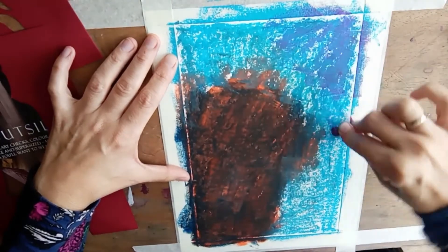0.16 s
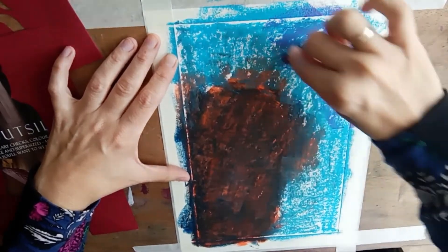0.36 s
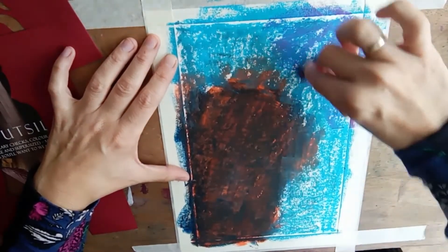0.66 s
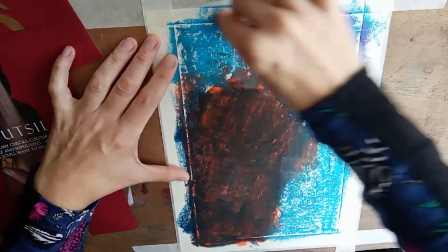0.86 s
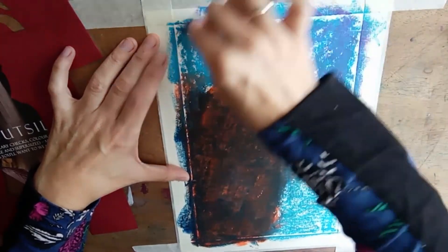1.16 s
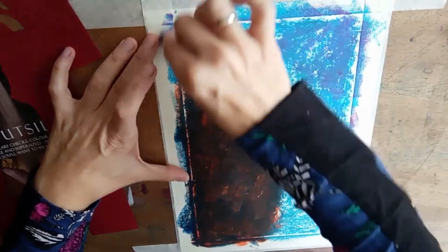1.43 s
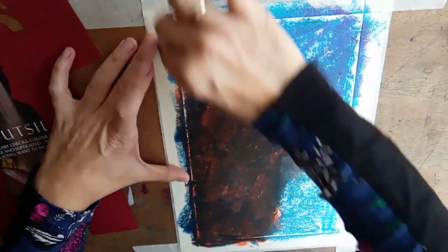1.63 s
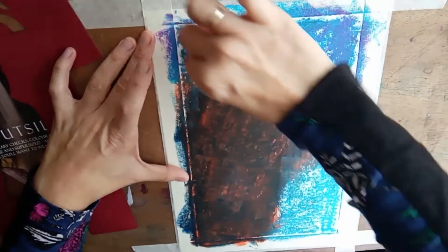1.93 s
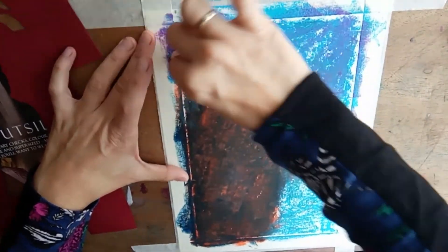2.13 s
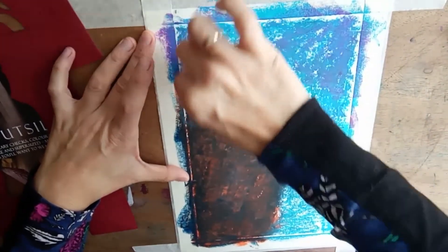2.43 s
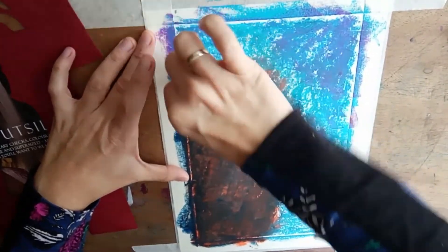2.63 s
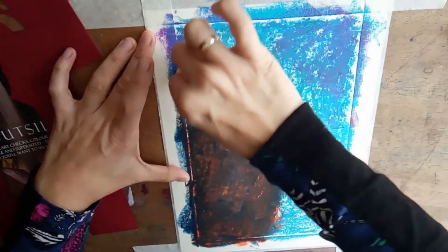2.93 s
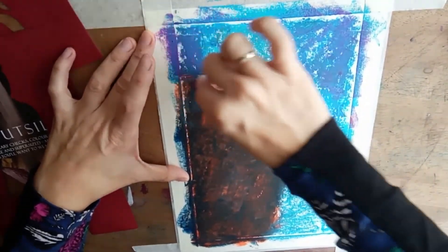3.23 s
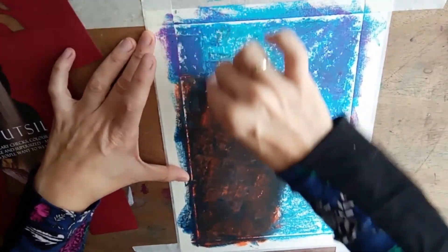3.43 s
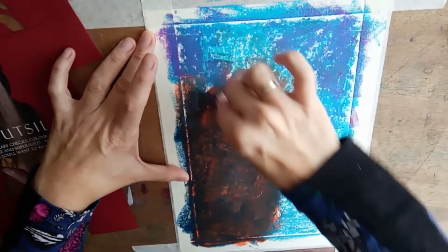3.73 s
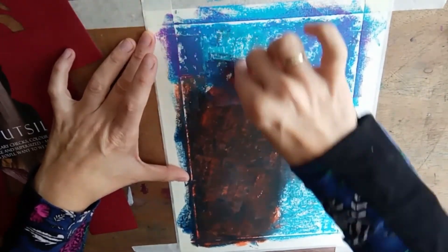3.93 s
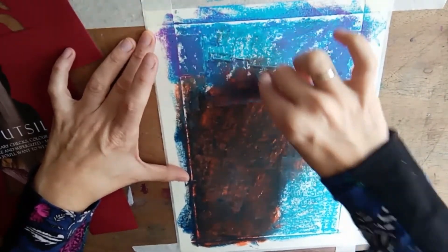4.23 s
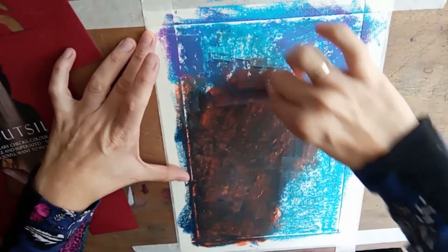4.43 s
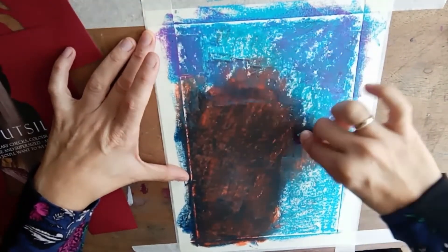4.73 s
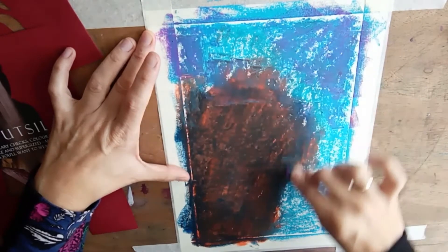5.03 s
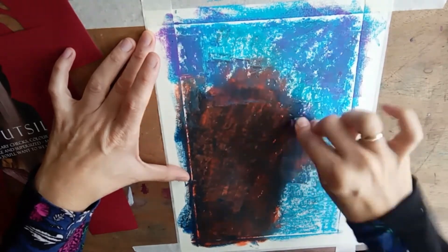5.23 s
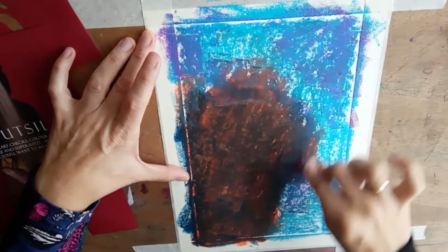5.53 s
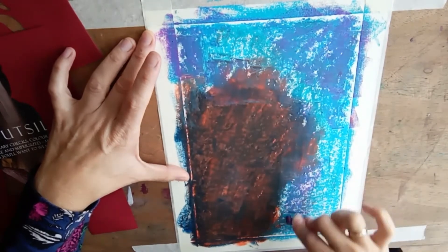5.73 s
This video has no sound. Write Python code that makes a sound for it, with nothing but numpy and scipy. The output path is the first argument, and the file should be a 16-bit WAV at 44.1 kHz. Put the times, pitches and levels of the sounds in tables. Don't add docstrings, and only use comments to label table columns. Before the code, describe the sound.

Brisk back-and-forth scribbling with a pastel on paper taped to a table: soft gritty hisses, each about a tenth of a second, over hollow low thuds. The first half is lighter and quite even; the second is harder and raspier, with busier board knocks and a click just after five seconds. Quiet indoor place, mono close microphone, faint hum and hush, treble briefly choked by noise reduction.

```python
import sys
import numpy as np
from scipy import signal
from scipy.fft import rfft, irfft
from scipy.io import wavfile
from scipy.ndimage import uniform_filter1d

SR = 44100
rng = np.random.default_rng(int(sys.argv[2]) if len(sys.argv) > 2 else 0)


def gain_from_decibels(decibels):
    exponent = np.asarray(decibels, float) / 20
    return 10 ** exponent


def unload_wav(signal):
    wavfile.write(
        sys.argv[1],
        SR,
        np.round(np.clip(np.atleast_2d(signal).T, -1, 1) * 32767).astype(np.int16),
    )


N = 258867
T = np.arange(N) / SR
COARSE_T = np.arange(0, N + 64, 32) / SR

# start [s], length [s], hiss [dB], grit
# over hiss [dB], rasp over hiss [dB].
STROKES = [(0.0, 0.13, -62.5, -7, -17), (0.102, 0.057, -66.5, -4.5, -19),
           (0.196, .12, -60.5, -4.5, -6.5), (0.301, .14, -65, -5.5, -15.5), (0.51, .11, -67, -0.5, -8),
           (0.675, 0.094, -65.5, -7.5, -25), (0.75, 0.16, -66.5, -6, -18.5),
           (0.932, 0.087, -68, -8, -18), (1.066, 0.063, -64, -10.5, -18.5),
           (1.154, .11, -64.5, -6.5, -11.5), (1.302, 0.095, -67, -11, -18), (1.426, 0.13, -64, -6, -8),
           (1.613, .11, -64, -5.5, -14.5), (1.758, .11, -65.5, -8, -11.5),
           (1.926, 0.096, -64.5, -6.5, -17), (2.053, 0.08, -63.5, -9, -13.5),
           (2.157, 0.079, -65, -13.5, -14.5), (2.268, 0.1, -64, -9, -16),
           (2.444, 0.073, -63, -9.5, -14.5), (2.567, 0.074, -68, -11, -12.5),
           (2.691, 0.085, -63.5, -10, -24.5), (2.833, 0.086, -69.5, -7, -16.5),
           (2.988, 0.073, -68.5, -13, -22), (3.137, 0.11, -75, -6, -13),
           (3.276, 0.092, -64.5, -9.5, -20), (3.42, 0.087, -64.5, -8.5, -16.5),
               (3.566, 0.076, -62.5, -7.5, -14), (3.683, 0.09, -65.5, -6.5, -10.5),
               (3.82, 0.082, -62, -7.5, -13), (3.898, 0.15, -65.5, -7, -15), (4.083, 0.1, -65, -6.5, -15),
               (4.211, .15, -68, -7, -14), (4.434, 0.076, -63, -6, -9.5), (4.491, 0.074, -73.5, -14, 1.5),
               (4.59, 0.12, -61.5, -5.5, -11.5), (4.784, 0.087, -61.5, -11.5, -20.5),
               (4.919, .15, -61.5, -3, -4.5), (5.11, 0.1, -60.5, -7, -9.5),
               (5.281, 0.13, -59.5, -2.5, -4.5), (5.453, 0.11, -57.5, -7, -9), (5.595, 0.16, -60, -6, -8),
               (5.735, 0.14, -71.5, -22, -16)]
# time [s], half length [s], grit [dB], rasp [dB].
CATCHES = [(.006, 0.012, -70.5, -66), (0.231, 0.019, -70, -76), (1.214, 0.026, -79, -73),
           (2.015, 0.023, -81, -70), (4.468, 0.014, -66.5, -69), (4.52, 0.022, -90, -73.5),
           (4.68, 0.044, -69.5, -61), (4.758, 0.048, -87, -77.5), (5.35, 0.032, -67, -64),
           (5.519, 0.0061, -57.5, -60), (5.72, 0.038, -70.5, -70)]

# frequency [Hz], density [dB per Hz].
HISS_SPECTRUM = [(3900, -24), (4400, -7), (4980, -1.5), (5900, -0.5), (6400, -3.5), (7000, -15),
                 (7600, -29), (8300, -42)]
# frequency [Hz], density [dB per Hz].
GRIT_LOW_SPECTRUM = [(2000, -17.5), (2400, -1.5), (2750, 0), (3100, -1.5), (3500, -27)]
# frequency [Hz], density [dB per Hz].
GRIT_TOP_SPECTRUM = [(2900, -26), (3300, -1), (3800, 0.5), (4300, 0), (5000, -20.5)]
# frequency [Hz], density [dB per Hz].
RASP_SPECTRUM = [(600, -6.5), (900, 0.5), (1200, -1.5), (1500, -5), (2000, -6), (2400, -11), (3000, -29)]
# frequency [Hz], density [dB per Hz].
AIR_SPECTRUM = [(6500, -14.5), (7800, -1.5), (9500, -1.5), (13500, -3), (14300, 1.5), (15200, 5.5),
                (15700, -1)]
# time [s], hiss above its split over hiss below [dB].
HISS_LEAN = [(0, 2.5), (.25, -0.5), (.55, 5.5), (.75, 1), (1.1, -6.5), (1.45, 0), (1.7, -8), (2.0, 1),
             (2.3, -2), (2.7, 1), (3.1, 1.5), (3.5, 0), (3.9, 2), (4.3, 4.5), (4.7, -4.5), (5.1, 2),
             (5.5, 2.5), (5.87, 4)]
# time [s], low band over high band [dB].
GRIT_LEAN = [(0, -0.5), (.35, 3), (1.0, -2.5), (1.55, -0.5), (2.0, 0), (2.6, -5.5), (3.3, 0.5), (3.8, -4.5),
             (4.0, 7.5), (4.3, -1), (4.5, 2.5), (4.85, -1.5), (5.7, -2.5), (5.87, 9)]
# time [s], low half over high half [dB].
RASP_LEAN = [(0, 5), (.3, -1.5), (.6, .3), (1.2, -2), (1.5, -10), (1.7, -9), (2.0, -3.5), (2.5, -4),
             (3.0, 2), (3.5, -1), (4.0, 0.5), (4.45, -5), (4.55, 2), (4.75, 13), (5.0, 3), (5.3, .3),
             (5.55, 3), (5.8, -3)]
# time [s], extra top band [dB].
SHEEN = [
    (0.0, -73),
    (1.5, -82),
    (1.625, -84),
    (1.68, -88),
    (2.35, -95),
    (2.5, -96),
    (3.585, -88),
    (5.37, -88),
]

# time [s], place [0 table middle - 1 edge].
PLACE = [(0, 0.53), (.6, 0.53), (1.2, 0.1), (1.8, 0.15), (2.4, 0.048), (3.0, 0.12), (3.6, 0.31),
         (4.2, 0.25), (4.6, 0.68), (5.2, 1), (5.87, 0.96)]
# frequency [Hz], level from the middle [dB], level from the edge [dB], t60 [s],
# group [0 main, 1 neighbour, 2 board, 3 small, 4 sway].
TABLE_MODES = [(59.3, -3, -1.5, 0.32, 4), (79.4, -3, -2, 0.2, 4), (120.8, -8, 1.5, 0.17, 4),
               (161.4, -3.5, -4, 0.14, 0.5), (188.5, -4.5, -4.5, 0.074, 2), (211.6, 0.5, 0.5, 0.35, 0),
               (279.4, 0, -19.5, 0.091, 2), (333.2, -14.5, -2, 0.074, 2), (387, -16, -8.5, 0.11, 2),
               (484, -16, -15, 0.06, 3), (541, -11, -11, 0.1, 3), (670, -28.5, -11, 0.027, 3),
               (806, -25, -13.5, 0.04, 3), (900, -28.5, -19, 0.1, 3), (1116, -16, -11.5, 0.031, 3)]
# full force [s], build-up [s], press
# [dB], arm weight [dB, drives no mode here], drag [dB].
PUSHES = [(.01, 0.061, -41, -47, -45), (.095, 0.041, -52, -51, -60), (.272, 0.057, -48, -51, -50),
          (.395, 0.32, -50.5, -50, -65.5), (0.563, 0.022, -63, -66, -52),
          (0.766, 0.071, -47.5, -39, -53), (0.969, 0.026, -54.5, -54, -49.5),
          (1.082, 0.0048, -43, -45, -53), (1.208, 0.052, -63, -54, -49),
          (1.356, 0.039, -49, -37.5, -51), (1.442, 0.013, -49, -47, -43.5),
          (1.483, 0.022, -48.5, -57, -51.5), (1.686, 0.13, -54, -62, -62),
          (1.751, 0.016, -48.5, -51, -73.5), (1.819, 0.046, -49, -51, -53),
          (1.95, 0.048, -47, -46, -51.5), (2.084, 0.028, -62, -48, -48),
          (2.193, 0.067, -86, -66, -58.5), (2.291, 0.017, -44.5, -52, -48),
          (2.474, 0.018, -45, -46, -57), (2.592, 0.067, -52.5, -49, -61),
          (2.745, 0.086, -85, -45.5, -64.5), (2.85, 0.024, -50.5, -64, -57),
          (3.024, 0.038, -55, -50.5, -55),
          (3.21, 0.01, -61, -67, -85), (3.355, 0.023, -70, -76, -95.5), (3.462, 0.056, -45, -45.5, -50),
              (3.586, 0.044, -47.5, -41.5, -43), (3.717, 0.049, -54.5, -55, -42.5),
              (3.843, 0.015, -42, -38.5, -37.5), (3.986, 0.01, -52, -45.5, -42.5),
              (4.122, 0.021, -45, -50, -62.5), (4.292, 0.053, -57.5, -42.5, -59),
              (4.483, 0.11, -50, -38, -70), (4.671, 0.079, -32, -35, -43), (4.82, 0.057, -43, -60, -61.5),
              (5.002, 0.077, -48.5, -40.5, -51.5), (5.181, 0.07, -49, -52, -50.5),
              (5.315, 0.056, -60, -54, -40), (5.5, 0.062, -54.5, -58, -44.5),
              (5.68, 0.086, -49.5, -64, -52)]
# time [s], force [dB].
ROCKS = [(.08, -52.5), (.29, -50), (.42, -61.5), (.59, -63.5), (.72, -54.5), (.82, -51.5), (.99, -70),
         (1.37, -51), (1.49, -58.5), (1.7, -61.5), (1.85, -60), (1.97, -48.5), (2.37, -59.5), (2.55, -55.5),
         (2.73, -69), (3.25, -71.5), (3.5, -59.5), (3.58, -55), (3.76, -58.5), (3.96, -57), (4.251, -54),
         (4.468, -48.5), (4.639, -47.5), (4.72, -52.5), (4.85, -62.5), (5.02, -64.5), (5.121, -57.5),
         (5.38, -55.5), (5.519, -52), (5.69, -56.5)]

# time [s], peak [dB], pitch [Hz].
JOLTS = [(0.094, -57, 283), (0.221, -51, 332.4), (0.252, -52, 289), (0.339, -52.5, 345), (0.552, -58, 274),
         (0.815, -47.5, 280), (0.964, -50.5, 301), (1.083, -54, 275), (1.167, -57, 254), (1.31, -57, 263),
         (1.357, -42, 278), (1.443, -41, 280), (1.516, -46.5, 289), (1.614, -45.5, 277),
         (1.652, -43.5, 280), (1.785, -48.5, 287), (1.819, -50, 290.5), (1.94, -58, 303),
         (1.968, -46.5, 271), (2.066, -49, 260), (2.085, -55, 266), (2.175, -51.5, 279), (2.29, -38, 279),
         (2.453, -46, 268), (2.471, -47, 280), (2.579, -51, 273), (2.70, -51, 300), (2.849, -43.5, 267),
         (3.015, -48, 270), (3.447, -41.5, 292), (3.472, -51, 279), (3.559, -59, 270), (3.588, -39.5, 272),
         (3.71, -41, 266.4), (3.841, -46.5, 310), (3.913, -50.5, 296), (3.968, -42.5, 273),
         (4.108, -57, 264), (4.288, -53, 310), (4.58, -45.5, 293), (4.599, -43, 374), (4.625, -38, 344),
         (4.652, -39, 272), (4.823, -50, 359), (4.951, -47, 359), (4.984, -42, 334), (5.035, -46, 323),
         (5.126, -45.5, 291), (5.141, -44.5, 252), (5.178, -42, 326), (5.27, -49, 375), (5.307, -32, 329),
         (5.331, -36, 349), (5.365, -40.5, 372), (5.482, -37, 317), (5.503, -40, 357.5), (5.626, -45, 330),
         (5.655, -36.5, 343)]
# time [s], peak [dB], pitch [Hz].
FLICKS = [(0.097, -64, 473), (0.213, -50.5, 535), (0.361, -58, 460), (0.428, -61.5, 478), (0.534, -60, 460),
          (0.593, -60, 542), (0.787, -57, 540), (1.082, -64, 592), (1.193, -55.5, 490), (1.359, -58, 518),
          (1.441, -55, 522), (1.481, -62, 500), (1.513, -69, 480), (1.637, -77, 480), (1.779, -66, 497),
          (1.828, -55, 540), (1.933, -70, 548), (1.965, -57.5, 494), (2.083, -51.5, 541), (2.192, -57, 521),
          (2.275, -65, 558), (2.462, -61.5, 588), (2.878, -77, 550), (3.021, -74, 484), (3.32, -69, 470),
          (3.448, -54.5, 550), (3.581, -53, 482), (3.609, -54, 573), (3.716, -66, 541), (3.841, -52, 577),
          (3.959, -66, 498), (4.0, -70, 580), (4.129, -62, 560), (4.27, -68, 470), (4.459, -50.5, 555),
          (4.589, -55, 511), (4.639, -53, 541), (4.801, -51, 474), (4.91, -75, 541), (4.95, -60, 483),
          (4.998, -57, 580), (5.138, -53, 561), (5.183, -55, 568), (5.236, -64, 580), (5.277, -57, 541),
          (5.326, -50.5, 550), (5.481, -45.5, 464), (5.517, -48, 581), (5.633, -60, 517), (5.705, -57, 813)]
# time [s], peak [dB], pitch [Hz].
THUMPS = [(0.25, -43, 161), (0.319, -42.5, 163), (0.587, -56, 136), (0.74, -39, 154.2), (1.082, -47, 176),
          (1.343, -34.5, 163), (1.433, -50, 156), (1.946, -39.5, 151.4), (2.464, -48, 151),
          (2.591, -45.5, 153), (2.70, -41, 152), (2.844, -55, 181), (3.585, -37.5, 155), (3.732, -50, 151),
          (3.855, -40.5, 147), (3.985, -43, 154.3), (4.252, -42, 176), (4.45, -46, 148),
          (4.486, -40.5, 143.6), (4.631, -39, 157), (4.828, -54, 149), (4.955, -43, 152), (4.997, -50, 174),
          (5.355, -44, 145)]
# time [s], peak [dB], pitch
# [Hz].
TAPS = [(4.498, -59.5, 857), (4.648, -51, 830), (4.973, -53.5, 711), (5.011, -55, 690), (5.181, -58, 695),
        (5.301, -55, 778), (5.481, -60, 690), (5.516, -51, 683), (5.652, -59, 824), (2.47, -68, 635),
        (4.667, -36, 340)]
# time [s], level [dB], pitch [Hz], t60 [s].
CRUMBS = [
    (1.35, -69, 2500, .012),
    (5.146, -47, 1250, .012),
    (1.692, -66, 4200, .005),
    (1.976, -64, 3000, .005),
    (1.978, -64, 5600, .005),
]

# frequency [Hz], density [dB per Hz].
ROOM_SPECTRUM = [(30, -24.5), (60, -10), (110, -13.5), (210, 5), (440, -32), (700, -33), (1000, -57.5)]
# frequency [Hz], density [dB per Hz].
HUSH_SPECTRUM = [(450, -21), (800, 0), (1600, 0.5), (2700, -2), (4000, -2.5), (5700, 8), (7000, -9.5),
                 (7800, -27)]
# time [s], depth [dB].
TREBLE_DROPS = [(.277, 26), (.882, 10), (1.258, 12), (1.555, 12), (1.626, 10), (1.72, 12), (2.206, 11),
                (2.323, 9), (3.135, 11), (3.206, 11), (3.412, 12), (3.57, 5), (3.925, 15), (4.184, 12),
                (4.552, 7), (4.807, 9), (4.97, 13), (5.413, 9)]
# frequency [Hz], share [0-1].
SHUT = [(850, 0), (950, 1), (3200, 1), (4600, .85), (4800, 0), (6400, 0), (6600, .8), (16000, .7)]

USUAL_HISS_DB = -63


def sliding():
    t, power = COARSE_T, 1e-12
    for start, length, hiss_db, grit_db, rasp_db in STROKES:
        touch, grip = np.minimum(t, start), np.minimum(t, start + 0.0065)
        bite = 0.39 * bell(touch, start, 0.032, 1) + 0.55 * bell(grip, start + 0.0065, 0.01, 1)
        lift = bell(np.maximum(t, start + length), start + length, 1, 0.027)
        speed = bite * bell(t, start + 0.55 * length, 0.89 * length, 0.57 * length)
        swell = bell(t, start + 0.5 * length, 0.45 * length, 0.58 * length)
        height = gain_from_decibels([[hiss_db + 1.5], [hiss_db + grit_db + 1.5], [hiss_db + rasp_db + 2.0]])
        power = power + (lift * height * [speed, swell, swell]) ** 2
    for s, half, grit_db, rasp_db in CATCHES:
        power[1:] += (gain_from_decibels([[grit_db], [rasp_db]]) * bell(t, s, half, half)) ** 2
    return [np.interp(T, t, np.sqrt(p)) for p in power]


def paper(hiss, grit, rasp):
    lean_db = in_time(GRIT_LEAN)[0] / 2
    fibres = tooth(8000, 0.51)
    low = gain_from_decibels(lean_db - 5.5) * coloured(fibres, GRIT_LOW_SPECTRUM, patchy_db=3.0, rate=4.4, count=7)
    top = gain_from_decibels(-lean_db - 2.0) * coloured(fibres, GRIT_TOP_SPECTRUM, patchy_db=2.5, rate=5.0, count=7)
    fine = coloured(tooth(14000, 0.68), HISS_SPECTRUM, patchy_db=1.4, rate=7.0, count=5)
    coarse = coloured(tooth(6000, 1.1), RASP_SPECTRUM, patchy_db=2.0, rate=7.9, count=4)
    coarse = tipped(coarse, 1620, -in_time(RASP_LEAN)[0])
    return hiss * leaning(fine, hiss) + grit * (low + top) + rasp * coarse + top_band(hiss)


def leaning(fine, hiss):
    over_db = np.clip(20 * np.log10(hiss + 1e-5) - USUAL_HISS_DB, -15, 8)
    edge_db = 0.94 * over_db
    stance = tipped(fine, 5240, in_time(HISS_LEAN)[0] - 0.3 * over_db)
    return tipped(stance, 7100, edge_db) * gain_from_decibels(edge_db / 2)


def top_band(hiss):
    sheen = sum(gain_from_decibels(db) * bell(COARSE_T, s, 0.024, 0.014) for s, db in SHEEN)
    lift = np.interp(T, COARSE_T, sheen) + gain_from_decibels(-93.5) * (hiss / gain_from_decibels(USUAL_HISS_DB)) ** 1.8
    air = coloured(rng.standard_normal(N), AIR_SPECTRUM, patchy_db=1.2, rate=8)
    peak = signal.sosfiltfilt(signal.butter(4, 14200, "high", fs=SR, output="sos"), air)
    return gain_from_decibels(-94.5) * air + lift * (peak + 0.45 * (air - peak))


def singing():
    hz, t60, half_s = 2810, 0.011, 0.17
    sung = ring(ring(rng.standard_normal(N), hz, t60), hz, t60)
    return gain_from_decibels(-79.5) * rms_one(sung) * bell(T, 4.14, half_s, half_s)


def table(grit, rasp):
    place, pushes = in_time(PLACE)[0], np.array(PUSHES)
    shapes = np.array([bell(COARSE_T, s, 0.68 * rise, 0.021) for s, rise, *db in pushes])
    drag_db = pushes[:, 4]
    small_db = 10.5 + 20 * np.log10(np.interp(pushes[:, 0], T, rasp)) + 0.3 * (drag_db - drag_db.mean())
    levels_db = np.column_stack([pushes[:, 2:], small_db])
    rocking = sway()
    turns = rng.random((len(pushes), len(TABLE_MODES)))
    luck = rng.standard_normal((len(pushes), len(TABLE_MODES)))
    out = np.zeros(N)
    for k, (hz, middle_db, edge_db, t60, group) in enumerate(TABLE_MODES):
        coupling = gain_from_decibels(middle_db + place * (edge_db - middle_db))
        even = np.sqrt(55 / (t60 * SR))
        if round(group) == 4:
            force = even * rocking * tooth(600, 2.6)
        else:
            strength = gain_from_decibels(levels_db[:, round(group)] + 1.9 * luck[:, k])
            in_step = (strength * np.exp(2j * np.pi * turns[:, k])) @ shapes
            in_step = np.real(np.interp(T, COARSE_T, in_step) * np.exp(2j * np.pi * hz * T))
            chance = np.interp(T, COARSE_T, strength @ shapes) * gain_from_decibels(-9.0)
            chance = chance + grit * gain_from_decibels(14.5 - hz / 30)
            force = in_step * (7 / t60 + 45) / SR * gain_from_decibels(-0.5) + even * chance * tooth(1200, 1.84)
        out += ring(coupling * force, hz, t60)
    return signal.sosfilt(signal.butter(4, 1100, fs=SR, output="sos"), out)


def sway():
    power = gain_from_decibels(2 * -77.5)
    for s, db in ROCKS:
        power = power + (gain_from_decibels(db) * bell(COARSE_T, s, 0.047, 0.041)) ** 2
    return np.interp(T, COARSE_T, np.sqrt(power))


def jolts(rows, gain_db, push_s, t60):
    out, t = np.zeros(N + SR), np.arange(SR // 4) / SR
    for (s, db, hz), turn in zip(rows, rng.random((len(rows), 1))):
        push = bell(t, 1.23 * push_s, push_s, push_s) * np.cos(2 * np.pi * (hz * t + turn))
        rung = ring(push, hz, t60)
        out[round(s * SR):][:len(t)] += gain_from_decibels(db + gain_db) * rung / np.abs(rung).max()
    return out[:N]


def crumbs():
    out = np.zeros(N)
    for s, db, hz, t60 in CRUMBS:
        push = np.zeros(N)
        push[round(s * SR)] = gain_from_decibels(db)
        out += ring(ring(push, hz, t60), hz, t60) * 19 / (t60 * SR)
    return out


def room_hum():
    return gain_from_decibels(-69.5) * coloured(rng.standard_normal(N), ROOM_SPECTRUM, patchy_db=2.5, rate=3.4, count=2)


def microphone_hush():
    return gain_from_decibels(-78.5) * coloured(rng.standard_normal(N), HUSH_SPECTRUM, patchy_db=1.6, rate=5.0)


def tooth(per_s, spread_db):
    sizes = gain_from_decibels(spread_db * np.minimum(rng.exponential(1, N), 5)) * rng.standard_normal(N)
    return rms_one(sizes * (rng.random(N) < per_s / SR))


def ring(force, hz, t60):
    r, w = gain_from_decibels(-60 / (max(t60, .005) * SR)), 2 * np.pi * hz / SR
    return signal.lfilter([0, np.sin(w)], [1, -2 * r * np.cos(w), r * r], force + 1e-18)


def bell(t, at, rise, fall):
    return np.exp(-((t - at) / np.where(t < at, max(rise, .003), max(fall, .003))) ** 2)


def coloured(source, spectrum, patchy_db, rate, count=3):
    hz = np.maximum(np.arange(N // 2 + 1) * SR / N, 1)
    points = np.array(spectrum)
    density_db = np.interp(np.log(hz), np.log(points[:, 0]), points[:, 1], left=-90, right=-90)
    shaped = rfft(source) * gain_from_decibels(density_db)
    centres = np.arange(np.log2(points[0, 0]), np.log2(points[-1, 0]) + 1 / count, 1 / count)
    out = np.zeros(N)
    for centre in centres:
        part = np.maximum(1 - count * abs(np.log2(hz) - centre), 0)
        out += irfft(shaped * part, N) * gain_from_decibels(patchy_db * drift(rate))
    return rms_one(out)


def drift(rate):
    r = np.exp(-80 * np.pi * rate / SR)
    slow = signal.lfilter([1], [1, -2 * r, r * r], rng.standard_normal(N // 40 + 2002))[2000:]
    return np.interp(np.arange(N) / 40, np.arange(len(slow)), rms_one(slow))


def tipped(x, hz, lean_db):
    upper = signal.sosfiltfilt(signal.butter(4, hz, "high", fs=SR, output="sos"), x)
    return upper * gain_from_decibels(lean_db / 2) + (x - upper) * gain_from_decibels(-lean_db / 2)


def in_time(rows):
    s, *columns = np.transpose(rows)
    return [np.interp(T, s, c) for c in columns]


def rms_one(x):
    return x / np.sqrt(np.mean(x ** 2) + 1e-20)


def scene():
    hiss, grit, rasp = sliding()
    sheet = paper(hiss, grit, rasp) + singing()
    board = table(grit, rasp) + crumbs()
    board += jolts(JOLTS, gain_db=-3.5, push_s=0.0077, t60=0.11)
    board += jolts(FLICKS, gain_db=-5.5, push_s=0.006, t60=0.13)
    board += jolts(THUMPS, gain_db=-7, push_s=0.017, t60=0.12)
    board += jolts(TAPS, gain_db=-4, push_s=0.0054, t60=0.11)
    return (sheet + board + room_hum() + microphone_hush())[None]


def thin_treble(x):
    hz, s, spec = signal.stft(x, SR, nperseg=1024, noverlap=896)
    power, hz = np.abs(spec) ** 2 + 1e-24, hz[:, None]
    near = uniform_filter1d(uniform_filter1d(power, size=21, axis=-2), size=11, axis=-1)
    smooth = uniform_filter1d(power, size=11, axis=-1)
    drop_db = sum(.6 * db * np.exp(-((s - at) / .009) ** 4) for at, db in TREBLE_DROPS)
    drop_db = drop_db * np.where((hz > 4600) & (hz < 6900), .3, 1)
    bite = np.interp(hz, [4000, 4800, 6900, 7100], [.85, .7, .7, .3])
    bite = bite * gain_from_decibels(np.where(hz < 7000, .55, 1.2) * drop_db)
    kept = np.clip(1 - bite * near / smooth, gain_from_decibels(-16 - 1.6 * drop_db), 1)
    gain = np.where(hz > 850, np.sqrt(kept) * gain_from_decibels(4.0), 1)
    return signal.istft(spec * gain, SR, nperseg=1024, noverlap=896)[1][..., :N]


def gate(x):
    t, hz = np.arange(0, N + 16, 8) / SR, np.arange(N // 2 + 1) * SR / N
    for moments in TREBLE_DROPS[::2], TREBLE_DROPS[1::2]:
        shut_db = sum(db * np.exp(-((t - at) / 0.008) ** 6) for at, db in moments)
        shut = 1 - gain_from_decibels(-1.2 * np.interp(T, t, shut_db))
        spared = (rng.random(200) < 0.5)[(hz / 170).astype(int)] & (hz < 4000)
        x = x - shut * irfft(rfft(x) * np.interp(hz, *np.transpose(SHUT)) * ~spared, N)
    return x


def low_pass(x):
    return signal.sosfilt(signal.butter(12, 15750, fs=SR, output="sos"), x)


def record(dry):
    x = signal.sosfilt(signal.butter(4, 46, "high", fs=SR, output="sos"), dry)
    return low_pass(gate(thin_treble(x)))


dry = scene()
out = record(dry)
unload_wav(out)
```